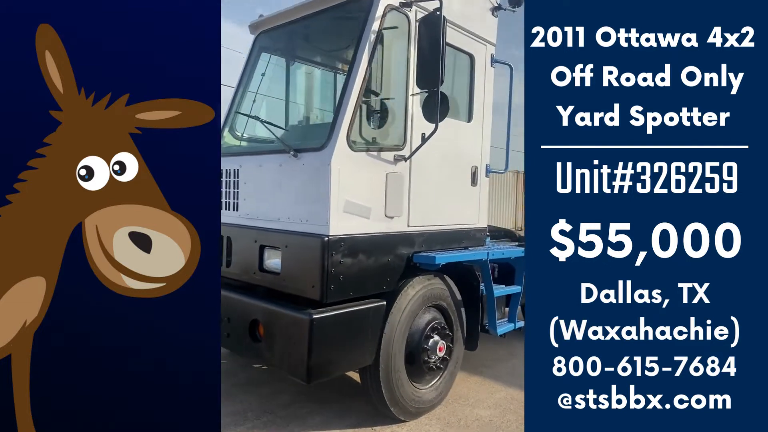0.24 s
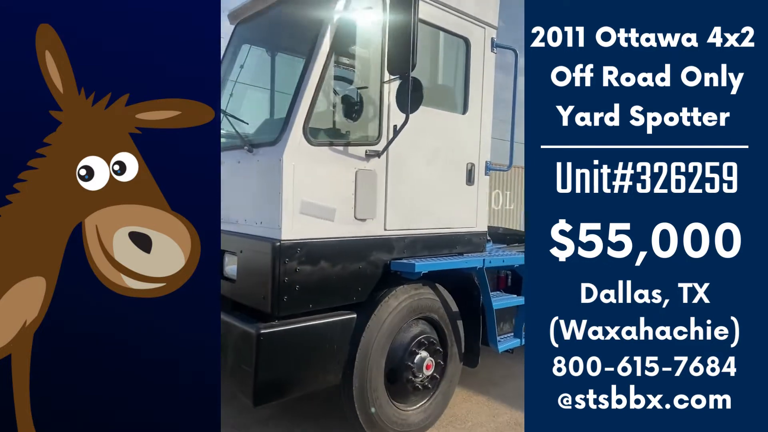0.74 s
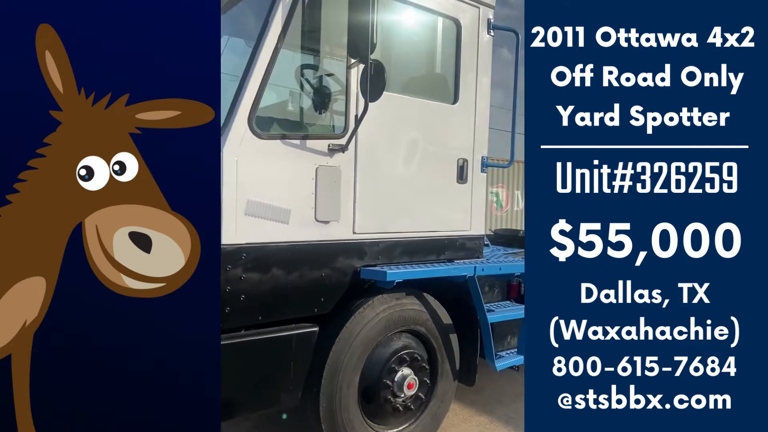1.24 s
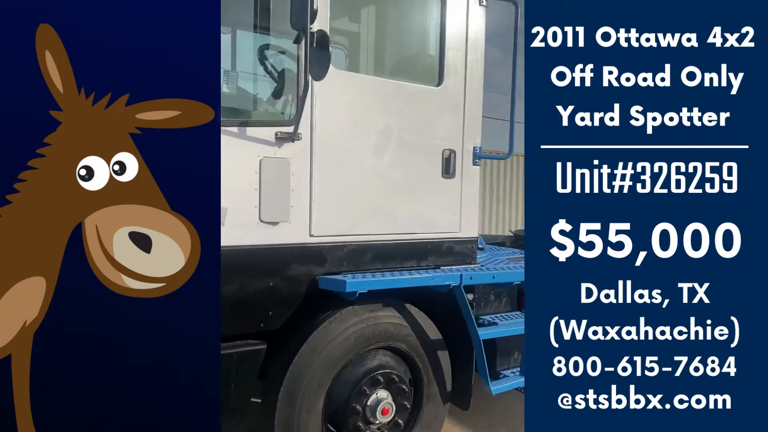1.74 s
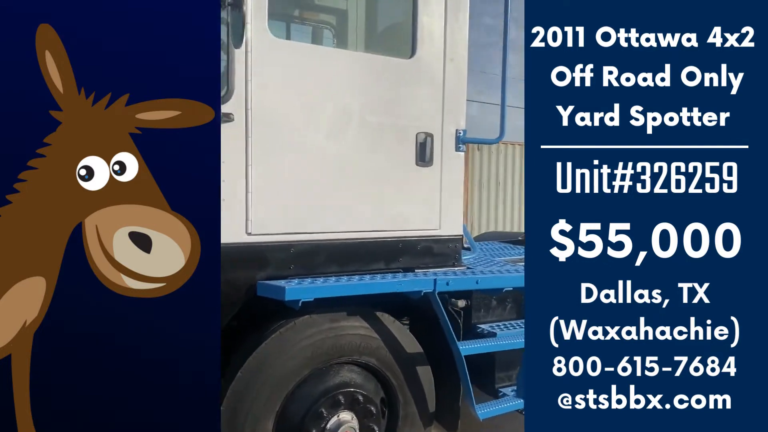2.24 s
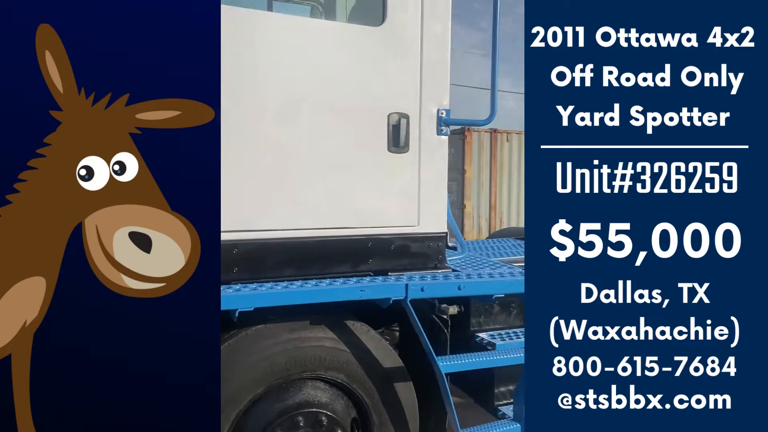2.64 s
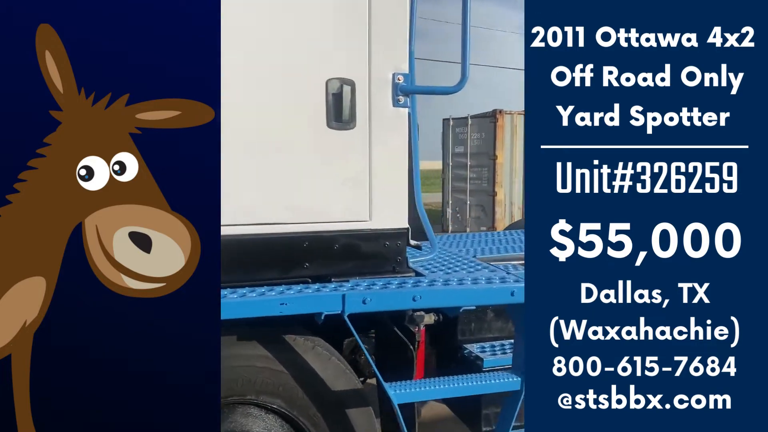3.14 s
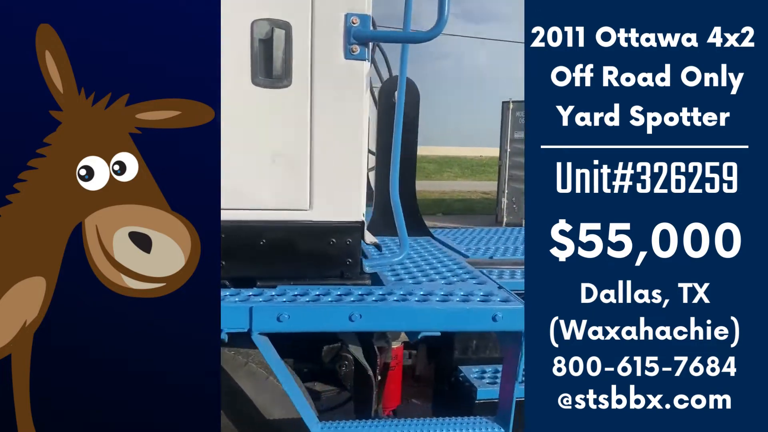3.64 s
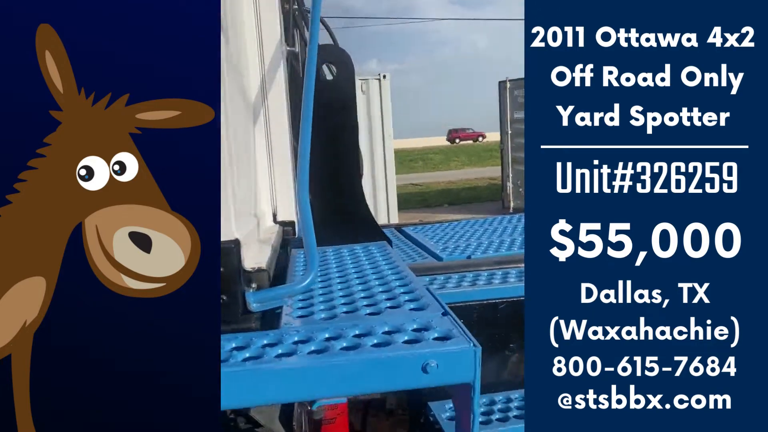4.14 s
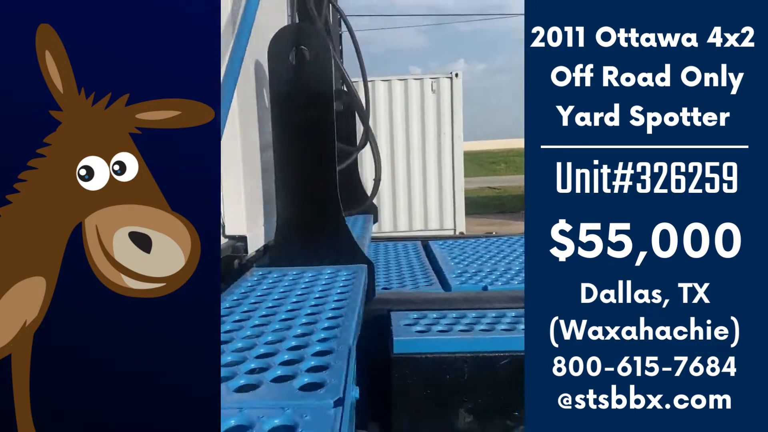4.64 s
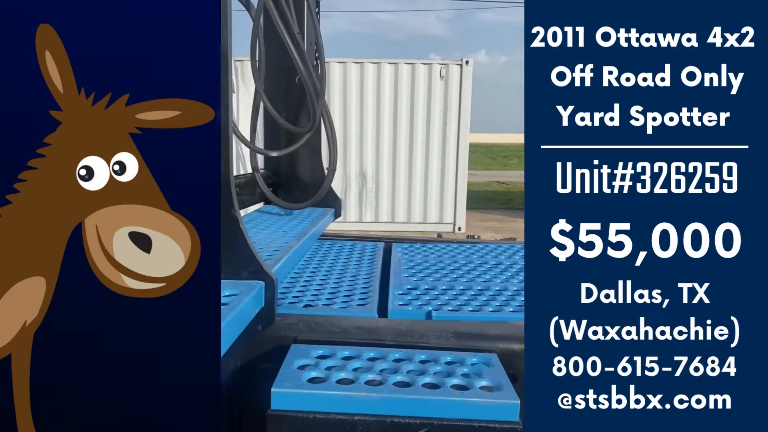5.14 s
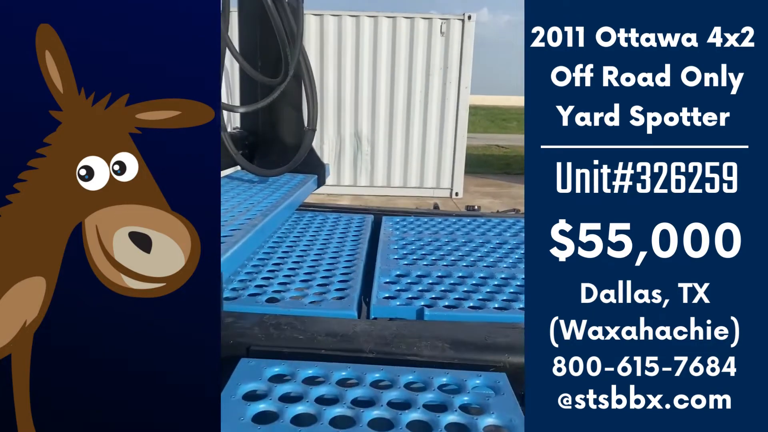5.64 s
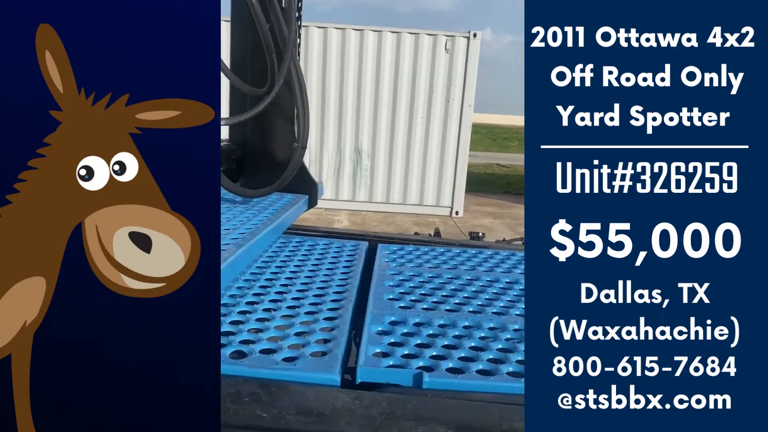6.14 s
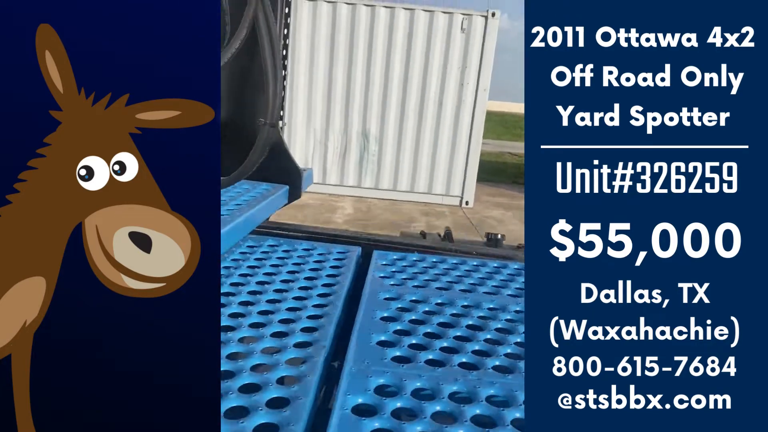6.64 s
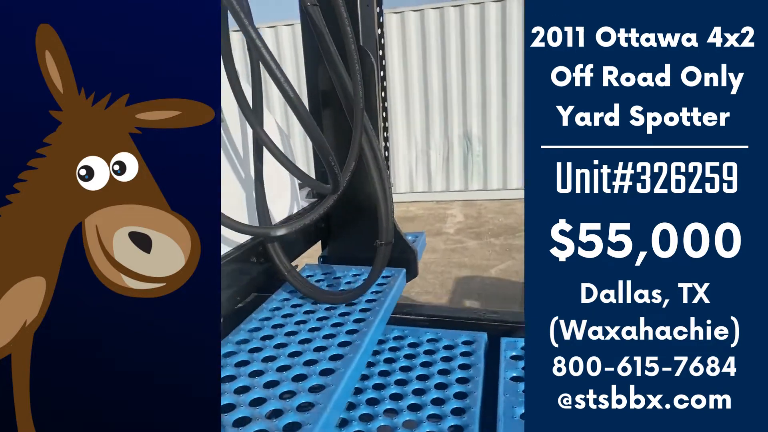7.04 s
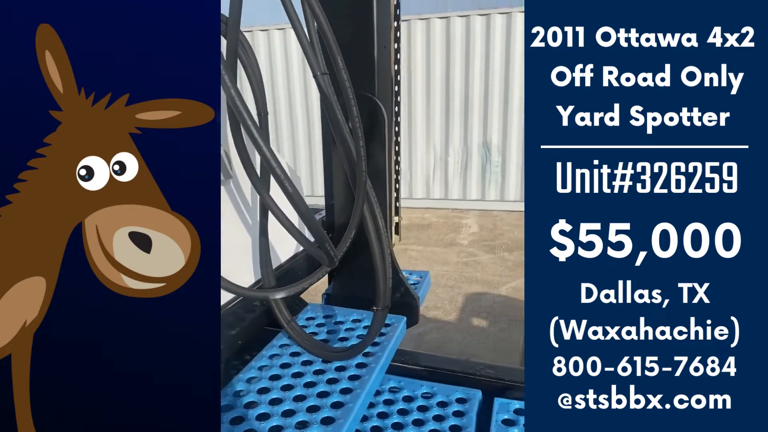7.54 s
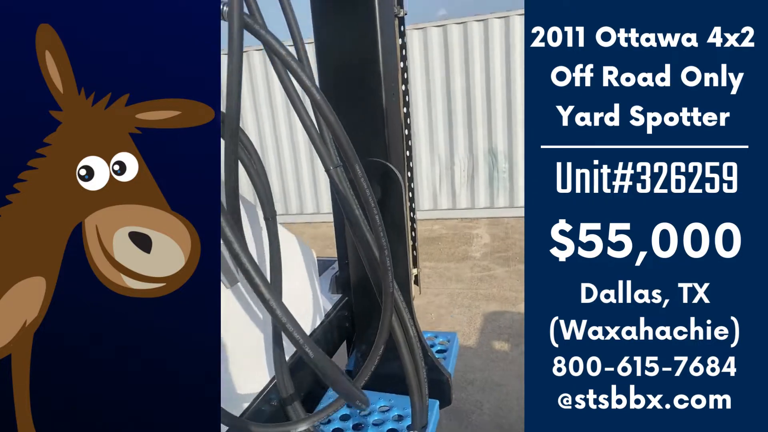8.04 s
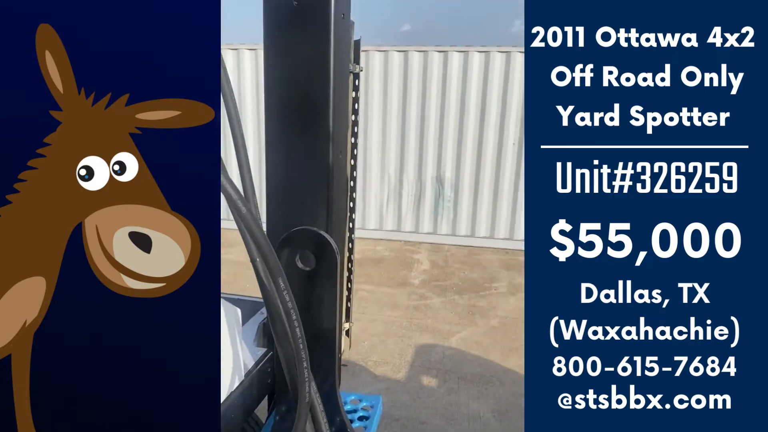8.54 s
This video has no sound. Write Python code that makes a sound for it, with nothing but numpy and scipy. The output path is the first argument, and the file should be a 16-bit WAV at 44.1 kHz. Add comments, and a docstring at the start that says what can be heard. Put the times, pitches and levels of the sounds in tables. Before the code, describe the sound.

Open yard, close moving microphone, one large truck idling at constant speed. Wind rumble, lulls and hard low thumps cover a dull engine clatter for the first five seconds. Then the air goes calm, treble clatter and metallic valve ticks having emerged first, the bass boom last. Exhaust pulses crackle at the nearest point, with a wavering gear whine, and the tone of the boom shifts further along.

```python
"""A six-cylinder diesel truck idles in an open yard; a hand-held microphone walks from the cab to the rear deck.
Beside the cab the engine is a muffled clatter, and gusts, thumps and crosswinds of air buffet the microphone.
From about 4 to 5.3 s the sources clear the corner of the cab, the bass last, and the wind dies away.
Near 6 s the walk passes closest to the engine: exhaust pops, booming firing pulses, open injector ticks.
Further along the deck the boom changes colour. Noise shaped by the firings makes the blows; sines the tones."""
import sys
import numpy as np
from scipy import signal
from scipy.fft import rfft, irfft, next_fast_len
from scipy.io import wavfile
from scipy.ndimage import uniform_filter1d

SR = 44100
rng = np.random.default_rng(int(sys.argv[2]) if len(sys.argv) > 2 else 0)


def bounce(signal):
    """Save signal as a 16-bit WAV file at the path given by the first command-line argument."""
    frames = np.transpose(np.atleast_2d(signal))
    limited = np.clip(frames, -1, 1)
    pcm = np.round(limited * 32767).astype(np.int16)
    wavfile.write(sys.argv[1], SR, pcm)


N = 387638
TIME, BINS = np.arange(N) / SR, np.fft.rfftfreq(next_fast_len(N), 1 / SR)


def gain_of(db):
    """Decibels to amplitude."""
    return 10 ** (np.asarray(db) / 20)


def evened(x):
    """Scales to rms 1."""
    return x / np.sqrt(np.mean(x ** 2) + 1e-20)


def curve(rows, axis=1):
    """One column of a time table at every sample."""
    columns = np.transpose(rows)
    return np.interp(TIME, columns[0], columns[axis])


def read(rows, axis=1):
    """One column of a frequency table at every bin, on a log frequency scale."""
    columns = np.transpose(rows)
    return np.interp(np.log(BINS + 1), np.log(columns[0] + 1), columns[axis])


def filtered(x, response):
    """Applies a frequency response."""
    size = next_fast_len(N)
    return irfft(rfft(x, size) * response, size)[..., :N]


def wander(rate_hz):
    """Slow chance of rms 1, with little above rate_hz."""
    return evened(filtered(rng.standard_normal(N), np.exp(-(BINS / rate_hz) ** 2)))


def swells(rows):
    """A gain that rises or sinks in a bell around each row's time; spread_s is its fall to 1/e in dB."""
    return gain_of(sum(db * np.exp(-((TIME - s) / spread_s) ** 2) for s, spread_s, db in rows))


def arch(start_s, end_s, shape):
    """A rise and fall between two times; the smaller the shape, the flatter its top."""
    return np.abs(np.sin(np.pi * np.clip((TIME - start_s) / (end_s - start_s), 0, 1))) ** shape


# When a source clears the corner of the cab, the bass last and fastest: clear_s, over_s
COVER_CLEARS, TREBLE_CLEARS = (3.9, .2), (4.55, .28)
KNOCK_CLEARS, BOOM_CLEARS = (5.31, .06), (5.28, .11)
NEAREST_S, PASSING_S = 6.15, 1.1  # the walk passes closest to the engine; fall to 1/e


def carried(levels, clears):
    """A source's gain along the walk: shaded by the cab, then in the open, with a change where one is nearest."""
    open_db, hidden_db, nearest_db = levels
    clear_s, over_s = clears
    in_view = 1 / (1 + np.exp((clear_s - TIME) / over_s))
    near = np.exp(-((TIME - NEAREST_S) / PASSING_S) ** 2)
    return gain_of(hidden_db + in_view * (open_db + nearest_db * near - hidden_db))


# The two microphone ports: frequency_hz, coherence (0-1), left_lead_rad, left_minus_right_db
MICROPHONE_PORTS = [(60, 1.0, -0.0, -0.0), (200, 1.0, 0.0, 0.0), (330, 0.95, 0.08, 0.6),
                    (600, 0.8, 0.46, 1.6), (1000, 0.75, 0.21, 3.6), (1900, 0.89, 0.21, -1.3),
                    (3000, 0.58, 1.1, -0.3), (3700, 0.63, 0.61, -0.1), (4300, 0.6, 0.94, -1.5),
                    (5100, 0.79, 0.31, -0.0), (6000, 0.66, 1.59, 0.4), (6700, 0.63, 2.51, 0.1),
                    (7800, 0.59, -0.01, 0.0), (14000, 0.9, 0.0, 0.0)]


def ports(pair):
    """Two unrelated signals become partly alike, as two nearby ports hear a large source; rms 1."""
    same = np.clip(read(MICROPHONE_PORTS), 0, 1)
    side = gain_of(read(MICROPHONE_PORTS, axis=3) / 2)
    lead = np.exp(1j * read(MICROPHONE_PORTS, axis=2))
    shared, apart = np.sqrt((1 + same) / 2), np.sqrt((1 - same) / 2)
    ear = np.array([side * lead, 1 / side])
    return evened(filtered(pair[0], ear * shared) + filtered(pair[1], ear * apart * [[1], [-1]]))


# Idle speed: time_s, rate_hz (firings a second)
IDLE_SPEED = [(0.0, 42.306), (1.0, 42.535), (2.0, 42.478), (3.0, 42.556), (4.0, 42.628), (5.0, 42.639),
              (6.0, 42.524), (7.0, 42.56), (8.0, 42.568), (8.8, 42.442)]


def crank():
    """Counts firings: the idle speed summed over time, with a slight random unevenness."""
    start_firings = .377
    return start_firings + np.cumsum(curve(IDLE_SPEED)) / SR + .004 * wander(9)


# Each cylinder's strength, in firing order: clatter_db, injector_tick_db, low_knock_db, valve_gear_db
CYLINDER_STRENGTHS = [(-1, .6, 0, .4), (.6, -.4, .3, 1.1), (.8, 0, .8, 1), (.3, .9, .5, .8),
                      (-1.1, -.4, -.3, -1.6), (.9, .9, -.6, 0)]


def bursts(firings, at, sharpness, depth, axis):
    """An envelope that swells at the same point of each firing, by that cylinder's strength."""
    which, through = np.divmod(firings - at + 1.5, 1)
    which = which.astype(int)
    strength_db = np.array(CYLINDER_STRENGTHS)[which % len(CYLINDER_STRENGTHS), axis]
    strength_db = strength_db + .5 * rng.standard_normal(which[-1] + 1)[which]
    swell = np.sin(np.pi * through ** 0.7) ** (2 * abs(sharpness))
    return uniform_filter1d(gain_of(strength_db), size=200) * (1 + depth * swell)


def rattle(firings, repeats):
    """A pair of noises; a share returns every engine cycle, as the same parts strike in the same order."""
    cylinders = len(CYLINDER_STRENGTHS)
    cycle_samples = round(cylinders * N / (firings[-1] - firings[0]))
    place = (firings / cylinders % 1 * cycle_samples).astype(int)
    pattern = rng.standard_normal((2, cycle_samples + 1))[:, place]
    share = np.clip(repeats, 0, 1)
    return filtered(pattern, np.sqrt(share)) + filtered(rng.standard_normal((2, N)), np.sqrt(1 - share))


# Groups of rattling parts: centre_hz, place_in_firing (firings), swell_depth (ratio), unevenness_db
RATTLING_PARTS = [(503, .5, .15, 2.8), (1100, 1.25, .12, .5), (1850, .95, .2, .8), (2750, .95, .42, 1),
                  (4270, .95, .06, 1.9), (6200, .85, .14, 1.9)]
# Clatter colour, relative: frequency_hz, beside_cab_db (per Hz), over_deck_db (per Hz)
CLATTER_COLOUR = [(100, -37, -11), (407, -13.5, -10.5), (640, -14, -13.5), (840, -12, -7.5),
                  (1430, -13, -12), (1930, -14, -10.5), (2520, -14, -12.5), (3310, -23.5, -18),
                  (5800, -25.5, -18), (7300, -30.5, -28), (8820, -31.5, -29), (10400, -59, -92),
                  (16000, -72, -83)]
# The walk as the clatter's colour hears it: time_s, place (0 beside the cab, 1 over the deck)
WALK = [(0, 0.47), (3.6, 0.065), (4.5, 0.48), (5.4, 0.61), (8.79, 0.92)]
CLATTER_DB = (-25, -27.5, 1)  # open_db, hidden_db, nearest_db
VALVES_ABOVE_HZ = 4000  # groups above this follow the valve gear's strengths


def clatter(firings):
    """Each combustion shakes several groups of parts, each unevenly and in its own register."""
    shake = rattle(firings, repeats=0.39 / (1 + (BINS / 1000) ** 2))
    rattling = 0
    centres = np.log(np.sort(np.transpose(RATTLING_PARTS)[0]))
    for own, (hz, at, depth, uneven_db) in zip(np.eye(len(RATTLING_PARTS)), RATTLING_PARTS):
        register = np.interp(np.log(BINS + 1), centres, own)
        blows = bursts(firings, at=at, sharpness=2, depth=depth, axis=3 if hz > VALVES_ABOVE_HZ else 0)
        blows = blows * gain_of(uneven_db * (wander(250) + 0.7 * wander(19.0)))
        rattling = rattling + filtered(shake, register) * evened(blows)
    place = np.clip(curve(WALK), 0, 1)
    # both colours are made equally strong between 900 and 6000 Hz
    middle = (BINS > 900) & (BINS < 6000)
    heard = 0
    for share, colour_db in ((1 - place, read(CLATTER_COLOUR)), (place, read(CLATTER_COLOUR, axis=2))):
        colour = gain_of(colour_db) / np.sqrt(np.mean(gain_of(colour_db) ** 2 * middle))
        heard = heard + share * filtered(evened(rattling), colour)
    # the truck's flat sides add an echo whose delay drifts around 3 ms
    delay_s = .003 + 0.00051 * wander(0.473)
    echo = np.array([np.interp(TIME - delay_s, TIME, channel) for channel in heard])
    return carried(CLATTER_DB, TREBLE_CLEARS) * ports(heard + 0.4 * echo) * np.std(heard)


# Ringing engine cover: frequency_hz, width_hz, level_db (relative)
COVER_MODES = [(1935, 70, 0)]
# The cover beams its ring in lobes that the walk crosses: time_s, spread_s, change_db
COVER_LOBES = [(4.14, .19, 6.5), (4.95, .17, 4), (5.9, .12, 3), (6.65, .2, 6), (8.7, .33, 6)]
COVER_DB = (-40.5, -42.5, 5.5)  # open_db, hidden_db, nearest_db


def covers(firings):
    """The engine's blows ring a thin cover at its resonance."""
    modes = sum(gain_of(db) / np.sqrt(width) / (1 + ((BINS - hz) / width) ** 2) for hz, width, db in COVER_MODES)
    throb = bursts(firings, at=1.03, sharpness=1.3, depth=.5, axis=0)
    ring = filtered(rattle(firings, repeats=0.097), modes) * throb
    return carried(COVER_DB, COVER_CLEARS) * swells(COVER_LOBES) * ports(ring)


# Bands of engine noise that swell and fade: start_s, end_s, first_hz, last_hz, width_hz, level_db
NOISE_BANDS = [(.3, 2.3, 200, 280, 50, -36), (-.4, 1.0, 470, 450, 70, -35), (.5, 1.66, 860, 860, 25, -38),
               (4, 4.65, 2110, 2035, 39, -32), (4.6, 5.2, 2070, 2060, 45, -36),
               (4.9, 5.4, 690, 690, 40, -39), (5, 6.2, 3950, 3850, 82, -39.5),
               (4.5, 7.0, 2400, 2700, 180, -34), (5.2, 6.4, 265, 235, 57, -27.5),
               (6.5, 7.9, 2030, 2045, 60, -32.5), (6.6, 7.9, 965, 965, 15, -39),
               (6.2, 7.4, 550, 510, 60, -34), (7.5, 10, 2480, 2600, 170, -33),
               (7.9, 9.2, 505, 480, 40, -35)]


def noise_bands(firings):
    """Narrow bands of engine noise, steady or gliding in pitch, throb with the firings as they swell and fade."""
    throb = bursts(firings, at=1.02, sharpness=1.3, depth=.7, axis=0)
    out = np.zeros(N)
    for start_s, end_s, first_hz, last_hz, width, db in NOISE_BANDS:
        progress = np.clip((TIME - start_s) / (end_s - start_s), 0, 1)
        turn = 2 * np.pi * np.cumsum(first_hz + (last_hz - first_hz) * progress) / SR
        # slow noise on a cosine and a sine makes a narrow band around the pitch
        a, b = filtered(rng.standard_normal((2, N)), 1 / (1 + (BINS / width) ** 2))
        band = evened(throb * (a * np.cos(turn) + b * np.sin(turn)))
        out += gain_of(db) * arch(start_s, end_s, 0.32) * band
    return out


def strikes(times, levels_db, crest_s):
    """The envelope of a run of strikes: each rises quickly and dies away."""
    hits, age = np.zeros(N), np.arange(0, 10, 1 / (crest_s * SR))
    hits[np.clip(np.round(times * SR).astype(int), 0, N - 1)] = gain_of(levels_db)
    return signal.oaconvolve(hits, age * np.exp(1 - age))[:N]


# Each cylinder's valve strike, in firing order: delay_firings, tick_db, ring_db (both relative)
VALVE_STRIKES = [(-.2, -5, -6), (-.15, -1, 1), (-.1, -1, 0), (-.17, 3, -.5), (-.1, -9, -8), (-.05, -1, 0)]
# Valve strikes that stand out: time_s, tick_db, ring_db
LOUD_CLINKS = [(5.374, -22, -24), (5.397, -30, -29), (5.658, -27, -29), (5.68, -29, -31), (6.824, -27, -26),
               (7.369, -20, -24), (7.442, -23, -36), (7.485, -29, -23), (8.008, -27, -34),
               (8.425, -28, -31)]
# The valve gear's ring has its own lobes: time_s, spread_s, change_db
VALVE_LOBES = [(.1, .3, 3), (.47, .03, 6), (2.4, .5, -2), (4, .5, 2), (7.2, .5, 3)]
VALVE_TICK_DB, VALVE_RING_DB = (-32, -40, 0), (-36.5, -40.5, 0)  # open_db, hidden_db, nearest_db
VALVE_HZ, VALVE_WIDTH_HZ, VALVE_SPREAD_DB = 4280, 110, 2.2  # ring pitch and width; chance from strike to strike
RING_HOLD = .25  # steady ring between strikes, added to the strikes' envelope
TICK_S, RING_S = .002, .005  # time to the crest of a strike's tick and of its ring


def tappets(firings):
    """Each valve strike is a broad tick and a narrow bright ring; two cylinders are faint, so the ticking limps."""
    count = np.arange(1, int(firings[-1]))
    delay, tick_db, ring_db = np.array(VALVE_STRIKES)[count % len(VALVE_STRIKES)].T
    times = np.interp(count + delay, firings, TIME)
    uneven_db = VALVE_SPREAD_DB * rng.standard_normal(len(count))
    loud_s, loud_tick_db, loud_ring_db = np.transpose(LOUD_CLINKS)
    usual_tick = carried(VALVE_TICK_DB, TREBLE_CLEARS) * strikes(times, tick_db + uneven_db, TICK_S)
    tick = np.hypot(usual_tick, strikes(loud_s, loud_tick_db, TICK_S))
    usual_ring = RING_HOLD + strikes(times, ring_db + uneven_db, RING_S)
    usual_ring = carried(VALVE_RING_DB, TREBLE_CLEARS) * swells(VALVE_LOBES) * usual_ring
    ring = np.hypot(usual_ring, strikes(loud_s, loud_ring_db, RING_S))
    broad = 1 / (1 + (1900 / (BINS + 1)) ** 8) / (1 + (BINS / 5200) ** 6) / np.sqrt(BINS + 1)
    narrow = 1 / (1 + ((BINS - VALVE_HZ) / VALVE_WIDTH_HZ) ** 2)
    return sum(level * ports(filtered(rng.standard_normal((2, N)), colour))
               for level, colour in ((tick, broad), (ring, narrow)))


INJECTOR_DB = (-37, -45.5, -1)  # open_db, hidden_db, nearest_db


def injectors(firings):
    """Fine uneven ticks just ahead of each combustion, with a bright hiss."""
    ticks = rng.standard_normal((2, N)) * bursts(firings, at=.82, sharpness=3, depth=.45, axis=1)
    colour = (1 - .8 * np.exp(-((BINS - 10300) / 600) ** 2)) / (1 + (6000 / (BINS + 1)) ** 4)
    upper = BINS > 10300
    # the upper and the lower hiss flicker separately
    hiss = sum(filtered(ticks, colour * band) * gain_of(.9 * wander(20) + .8 * wander(300))
               for band in (upper, ~upper))
    return carried(INJECTOR_DB, TREBLE_CLEARS) * ports(hiss)


# The low knock's colour, relative: frequency_hz, level_db (per Hz)
LOW_KNOCK_COLOUR = [(30, -9), (75, 0), (110, 1), (145, 2), (190, -1), (290, -3.5), (450, -1.5), (600, -6),
                    (900, -16.5), (2000, -33), (16000, -88)]
KNOCK_DB = (-27, -31, 5.5)  # open_db, hidden_db, nearest_db


def knock(firings):
    """Rough thuds; their upper part is much alike from one engine cycle to the next."""
    thuds = rattle(firings, repeats=.55 / (1 + (260 / (BINS + 1)) ** 4))
    blows = bursts(firings, at=.85, sharpness=2.5, depth=.25, axis=2) * gain_of(2 * wander(60))
    coloured = filtered(thuds * blows, gain_of(read(LOW_KNOCK_COLOUR)))
    return carried(KNOCK_DB, KNOCK_CLEARS) * ports(coloured)


# The boom's strong lines, relative: multiple (of the firing rate), near_pipe_db, far_end_of_deck_db
BOOM_LINES = [(1, 0, 0), (2, -9, -2.6), (3, -3.8, -6.8), (4, -17, -17), (5, -8.5, -6.3)]
# The boom swells and sinks along the cab's side: time_s, spread_s, change_db
CAB_SIDE_LOBES = [(1.1, 0.55, 2.5), (3.5, 1.6, -1.5)]
EXHAUST_DB = (-21.5, -36, 0)  # open_db, hidden_db, nearest_db


def exhaust(firings):
    """One pressure pulse a firing, smeared by the pipe; its colour changes along the deck."""
    turn = 2 * np.pi * (firings - .46)
    along = np.interp(TIME, [6.7, 8.0], [0, 1])
    smear_rad, waver_db = .16, .6
    boom = 0
    for k, near_db, far_db in BOOM_LINES:
        level_db = near_db + along * (far_db - near_db) + waver_db * wander(24)
        boom = boom + gain_of(level_db) * np.cos(k * turn - smear_rad * (k - 1) ** 2)
    return -np.sqrt(2) * carried(EXHAUST_DB, BOOM_CLEARS) * swells(CAB_SIDE_LOBES) * boom


SHAFT = 38 / 3  # one gear tone's multiple of the firing rate
# Gear whine and engine hum, relative: multiple (of the firing rate), level_db
GEAR_TONES = [(10 / 3, -15), (6, -16), (7, -17.5), (9, -21), (11, -19), (12, -21), (SHAFT, -17.5),
              (14, -15.5), (25, -23)]
GEAR_DB = (-28, -30.5, 6)  # open_db, hidden_db, nearest_db


def gears(firings):
    """Wavering tones locked to the crank."""
    hum = 0
    for k, db in GEAR_TONES:
        hum = hum + gain_of(db + 3.2 * wander(2.8)) * np.sin(2 * np.pi * k * firings + .5 * wander(3.2))
    return np.sqrt(2) * carried(GEAR_DB, KNOCK_CLEARS) * hum


EDDY_HZ = 220  # eddies faster than this are too small to cover both ports


def eddies(response, alike):
    """Turbulence at both ports: large eddies cover both, small ones only one."""
    same = np.clip(alike, 0, 1) / (1 + (BINS / EDDY_HZ) ** 2)
    shared, own = rng.standard_normal(N), rng.standard_normal((2, N))
    return evened(filtered(shared, response * np.sqrt(same)) + filtered(own, response * np.sqrt(1 - same)))


# Gusts: start_s, end_s, level_db
WIND_GUSTS = [(.8, 1.6, -29.5), (1.397, 2.06, -24), (2.38, 3.125, -28.5), (3.172, 3.943, -24.5),
              (3.92, 4.784, -23.5)]
# Lulls between the gusts: time_s, spread_s, change_db
WIND_LULLS = [(.18, .03, -8), (.38, .03, -8), (2.08, .025, -8), (2.2, .08, -7), (3.46, .025, -8),
              (4.51, .05, -10), (4.82, .04, -6), (5.0, .03, -8)]
# Wind rumble's colour, relative: frequency_hz, level_db (per Hz)
WIND_COLOUR = [(20, -22), (40, -2), (58, 6), (100, 3), (135, -1), (200, -3.5), (290, -4.5), (400, -8),
               (700, -13), (1500, -27), (16000, -90)]
BREEZE_DB, GUST_SHAPE, FLUTTER_DB = -30.5, 0.17, 1.5  # gusts swell as a flat arch over a steady breeze
LEE_S, LEE_DB_PER_S = 5, -38  # behind the cab the breeze dies away


def wind():
    """Lumpy rumble that swells in gusts and sinks in lulls; it dies in the lee of the cab."""
    power = gain_of(BREEZE_DB + LEE_DB_PER_S * np.maximum(TIME - LEE_S, 0)) ** 2
    for start_s, end_s, db in WIND_GUSTS:
        power = power + (gain_of(db) * arch(start_s, end_s, GUST_SHAPE)) ** 2
    rumble = eddies(gain_of(read(WIND_COLOUR)), alike=0.93)
    # the gusts set the strength; the eddies only give the grain
    strength = np.sqrt(np.abs(uniform_filter1d((rumble ** 2).mean(0), size=3200)) + 1e-6)
    grain = evened(rumble / strength * gain_of(FLUTTER_DB * wander(36)))
    return np.sqrt(power) * swells(WIND_LULLS) * grain


def buffet(db, low_hz, high_hz, length_s):
    """One eddy hits the ports: a quick swell of noise, the deeper the more alike in both."""
    age = np.arange(0, 2 * length_s, 1 / SR) / (length_s / 2)
    swell = age * np.exp(1 - age ** 2)
    noise = rng.standard_normal((3, SR // 2))
    edges = [low_hz, min(max(high_hz, 1.2 * low_hz), SR / 4)]
    band = signal.butter(N=2, Wn=edges, btype="band", fs=SR, output="sos")
    air = signal.sosfilt(band, noise[0] + .5 * np.sqrt(low_hz * high_hz) / EDDY_HZ * noise[1:])
    # partly level the noise, so that the swell shapes the thump
    strength = np.sqrt(np.mean(np.abs(signal.hilbert(air)) ** 2, axis=0))
    grain = (air / strength ** .7)[:, -len(age):]
    soften = signal.butter(N=3, Wn=min(1.4 * high_hz, SR / 4), fs=SR, output="sos")
    thump = signal.sosfiltfilt(soften, swell * grain)
    return gain_of(db) * evened(thump) * np.sqrt(np.mean(swell ** 2))


# Single buffets: start_s, level_db, lowest_hz, highest_hz, length_s
WIND_BUFFETS = [(.075, -24, 45, 140, .06), (.22, -26, 60, 300, 0.052), (.495, -23.5, 170, 400, 0.036),
                (1.0, -23, 100, 380, .08), (1.15, -25, 45, 140, 0.045), (1.593, -12, 45, 115, 0.04),
                (1.686, -11.5, 169, 330, 0.045), (1.692, -16, 60, 170, 0.037),
                (1.742, -17.5, 230, 420, 0.049), (1.785, -14.5, 55, 140, .035),
                (1.818, -23, 200, 800, .025), (1.892, -23, 180, 650, 0.032), (1.937, -22, 170, 650, .03),
                (2.305, -21.5, 120, 700, 0.038), (2.435, -21.5, 60, 219, .035),
                (2.485, -23, 60, 160, 0.031), (2.68, -22.5, 60, 200, 0.039), (2.825, -18.5, 45, 170, .055),
                (2.83, -23, 200, 600, 0.058), (2.885, -21, 60, 200, 0.031), (3.235, -21, 50, 150, .035),
                (3.265, -22, 150, 420, .04), (3.51, -20, 50, 200, 0.041), (3.555, -21, 50, 200, 0.042),
                (3.628, -18.5, 50, 130, 0.039), (3.78, -22, 130, 700, .1), (3.812, -22.5, 60, 160, .04),
                (3.95, -18, 55, 150, .035), (4.07, -20, 55, 150, 0.036), (4.18, -22.5, 60, 150, .04),
                (4.335, -16, 55, 140, .035), (4.4, -20, 80, 230, 0.058), (4.542, -19.5, 200, 600, .025),
                (4.575, -18, 40, 200, .05), (4.618, -21.5, 150, 400, 0.019),
                (4.672, -18.5, 150, 750, 0.033), (4.693, -15.5, 40, 120, 0.038),
                (4.732, -17, 50, 160, .025), (5.094, -21, 50, 220, .03)]


def buffets():
    """Single thumps of air on the microphone."""
    out = np.zeros((2, N))
    for start_s, db, low_hz, high_hz, length_s in WIND_BUFFETS:
        air, at = buffet(db, low_hz, high_hz, length_s), round(start_s * SR)
        out[:, at:at + air.shape[1]] += air
    return out


# In the wind the low mids dip briefly: time_s, spread_s, change_db
LOW_MID_DIPS = [(1.25, .06, -3), (1.53, .055, -4), (2.17, .07, -8), (2.28, .04, -4), (3.11, .07, -6),
                (3.66, .04, -10), (4.15, .03, -8), (4.24, .03, -5), (4.49, .04, -7), (4.65, .02, -5)]


def dipped(x):
    """The low mids sink for a moment, several times; in the lulls the whole bass sinks."""
    low_mids = filtered(x, 1 / (1 + (170 / (BINS + 1)) ** 4) / (1 + (BINS / 750) ** 4))
    bass = filtered(x, 1 / (1 + (BINS / 150) ** 4))
    return x + (swells(LOW_MID_DIPS) - 1) * low_mids + (np.sqrt(swells(WIND_LULLS)) - 1) * bass


# Winds that push on one port and pull on the other: start_s, end_s, level_db
CROSSING_WINDS = [(.33, .58, -37), (1.05, 1.97, -28.5), (1.48, 1.7, -27), (3.6, 3.78, -32),
                  (4.18, 4.78, -28.5), (4.94, 5.0, -31), (5.95, 6.45, -38)]
# Their rumble's colour, relative: frequency_hz, level_db (per Hz)
CROSSING_COLOUR = [(20, -10), (50, 0), (140, 0), (300, -2), (700, -8), (1200, -17), (2500, -38),
                   (16000, -90)]


def crosswinds():
    """Air sweeping across the microphone flutters in opposite senses at its two ports."""
    power = sum(gain_of(db) ** 2 * arch(start_s, end_s, .5) for start_s, end_s, db in CROSSING_WINDS)
    rumble = filtered(rng.standard_normal(N), gain_of(read(CROSSING_COLOUR))) * gain_of(2.5 * wander(25))
    return np.sqrt(power) * evened(rumble) * [[1], [-1]]


WHINE = 136 / 3  # meshing gear teeth per firing
# Clear engine tones that swell as the walk crosses their lobes:
# multiple (of the firing rate) -> rows of time_s, spread_s, level_db
LOBED_TONES = {5: [(1.1, .6, -42)], 8: [(.55, .55, -33), (5.6, .35, -32), (6.65, .7, -27.5),
               (7.6, .5, -31.5)], 16: [(2.8, 2, -47), (5.1, .33, -34.5), (5.95, .35, -41)],
               24: [(2, 2, -43.5), (5.45, .55, -35.5), (8.5, .9, -43)], WHINE: [(1.5, 2.5, -44),
               (4.2, .35, -32.5), (4.92, .26, -32), (5.4, .15, -36), (6.0, .3, -32.5), (6.65, .27, -26.5),
               (7.3, .45, -36), (8.7, .35, -31.5)]}
TONE_WAVER_DB, TONE_THROB = 2.2, .4  # waver and swell depth at the gear whine; lower tones have less
TONE_JITTER = .0016  # firings


def tones(firings):
    """Clear tones locked to the crank, loud only in their lobes; the higher, the more they waver and throb."""
    throb = evened(bursts(firings, at=1.03, sharpness=1.3, depth=TONE_THROB, axis=0))
    flutter = gain_of(TONE_WAVER_DB * wander(25))
    turns = firings + TONE_JITTER * wander(22)
    out = 0
    for k, lobes in LOBED_TONES.items():
        power = sum((gain_of(db) * np.exp(-((TIME - s) / spread_s) ** 2)) ** 2 for s, spread_s, db in lobes)
        unsteady = evened((throb * flutter) ** (k / WHINE))
        out = out + np.sqrt(2 * power) * unsteady * np.sin(2 * np.pi * k * turns)
    return out


# The hardest exhaust pops: time_s, peak_db
EXHAUST_POPS = [(5.783, -10), (5.901, -11), (6.018, -12), (6.231, -10), (6.371, -10), (6.395, -12),
                (6.442, -7), (6.512, -8)]
POP_S = .0008  # fall to 1/e
PUFF_DB = (-29, -46, 8.5)  # open_db, hidden_db, nearest_db
PUFF_AT, PUFF_S, PUFF_SPREAD_DB = .41, .0011, 3.5  # point in the firing 0-1, fall to 1/e, unevenness


def puffs(firings):
    """Close to the pipe each exhaust pulse has a sharp crest, now weak, now strong."""
    which, through = np.divmod(firings - PUFF_AT + 1.5, 1)
    which = which.astype(int)
    chance = np.minimum(rng.standard_normal(which[-1] + 1), 2)
    strength = gain_of(PUFF_SPREAD_DB * chance)[which]
    from_crest_s = (through - .5) / curve(IDLE_SPEED)
    crests = strength * np.exp(-(from_crest_s / PUFF_S) ** 2)
    pops = sum(gain_of(db) * np.exp(-((TIME - s) / POP_S) ** 2) for s, db in EXHAUST_POPS)
    return -carried(PUFF_DB, BOOM_CLEARS) * crests - pops


def scene():
    """The crank drives every engine sound; the wind blows on top."""
    firings = crank()
    sources = (clatter, covers, noise_bands, tappets, injectors, knock, exhaust, gears, tones, puffs)
    engine = sum(source(firings) for source in sources)
    return dipped(engine + wind()) + buffets() + crosswinds()


def record(dry):
    """The microphone's bass cut at 36 Hz, then the band limit at 15850 Hz."""
    thinned = filtered(dry, 1 / np.sqrt(1 + (36 / (BINS + 1)) ** 14))
    band_limit = signal.firwin(511, 15850, window=("kaiser", 9), fs=SR)
    return signal.oaconvolve(thinned, band_limit[None], "same")


dry = scene()
out = record(dry)
bounce(out)
```